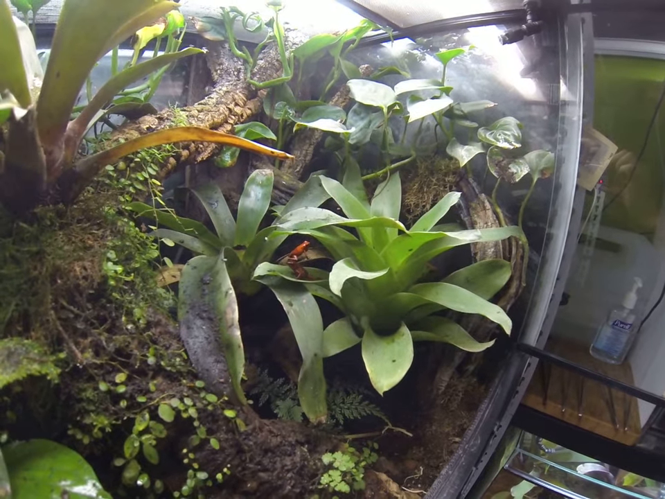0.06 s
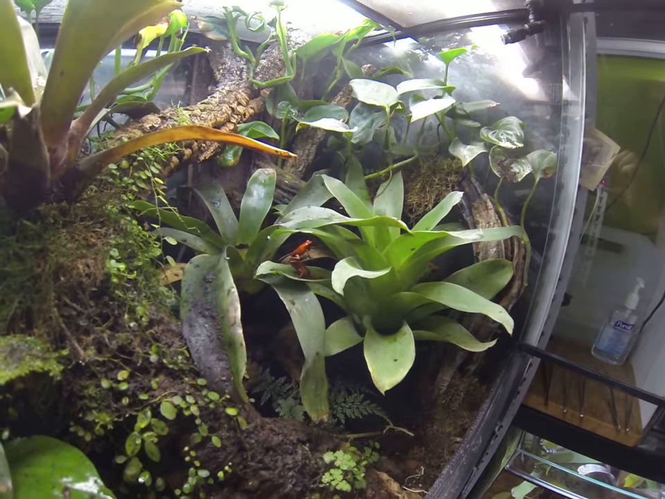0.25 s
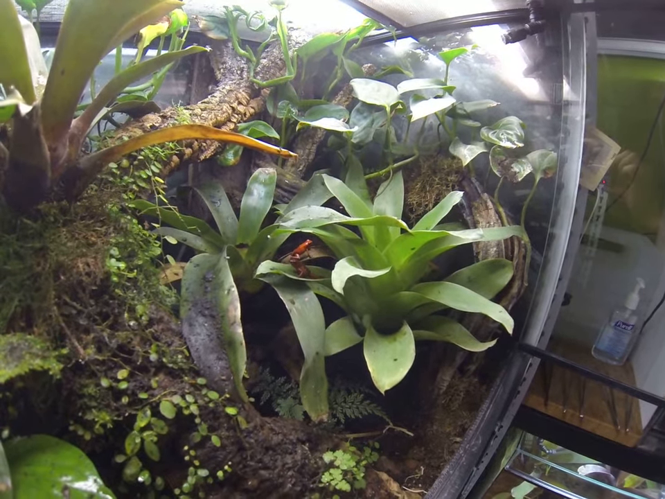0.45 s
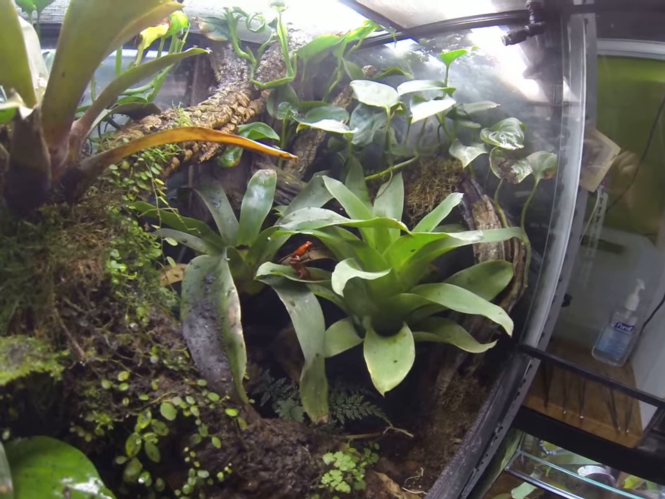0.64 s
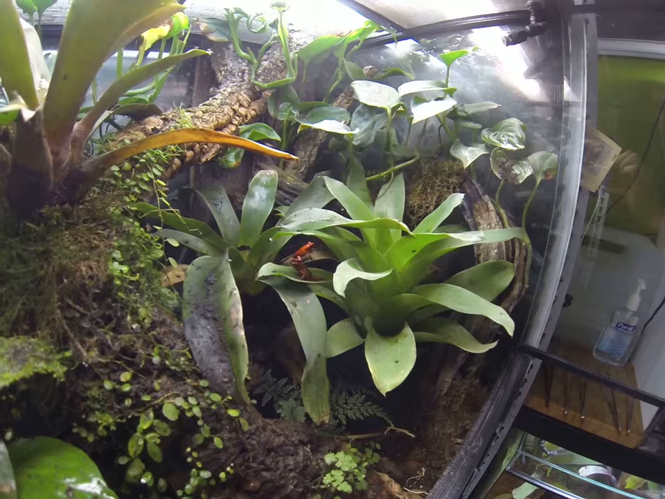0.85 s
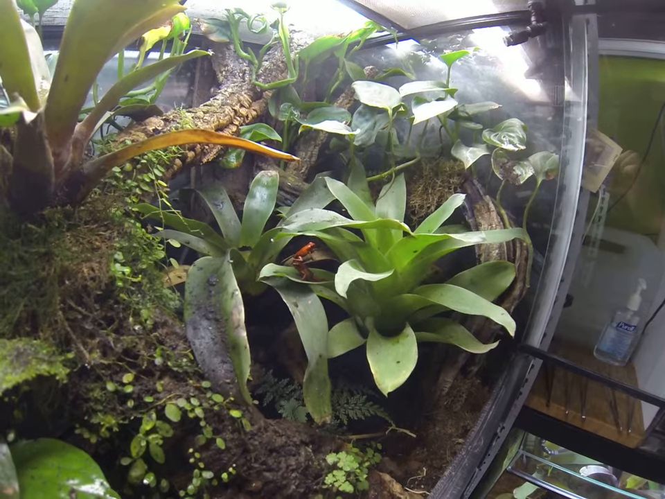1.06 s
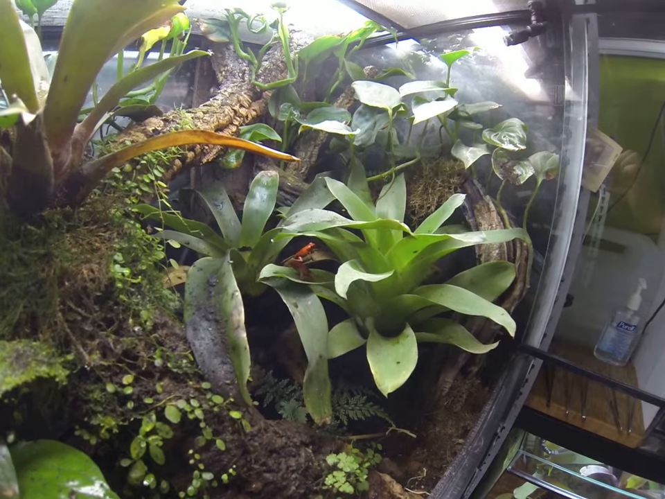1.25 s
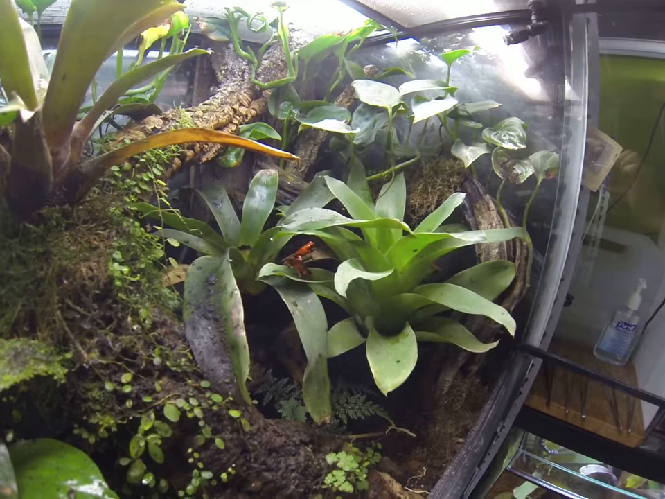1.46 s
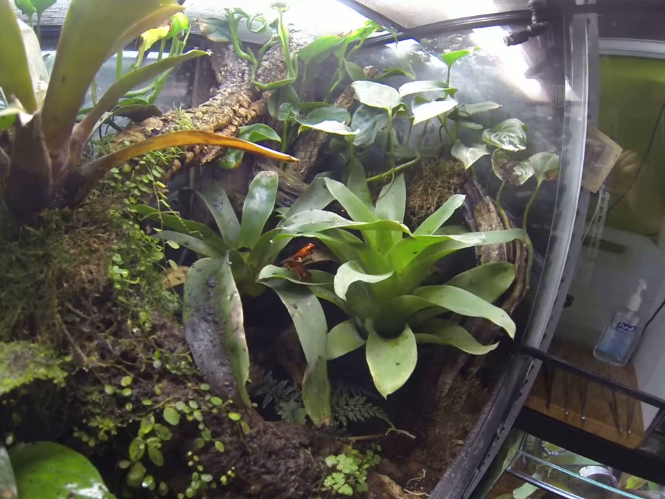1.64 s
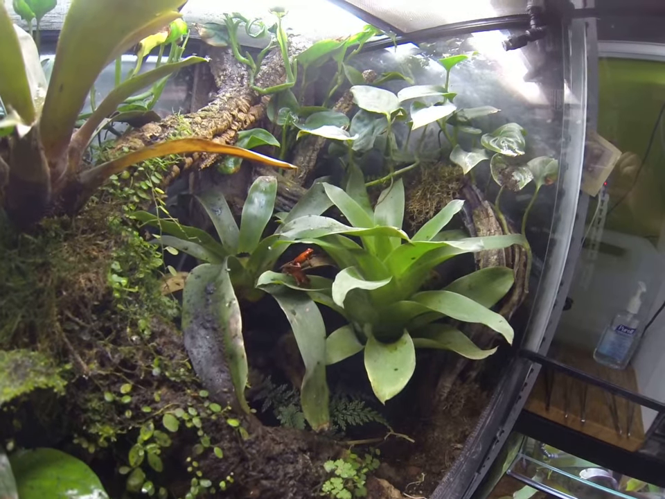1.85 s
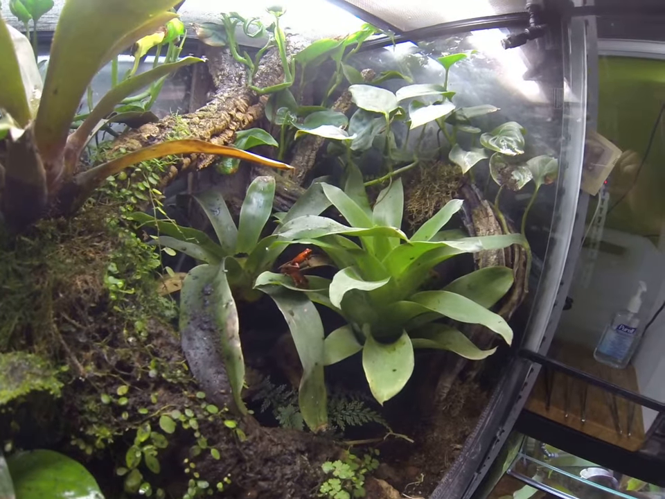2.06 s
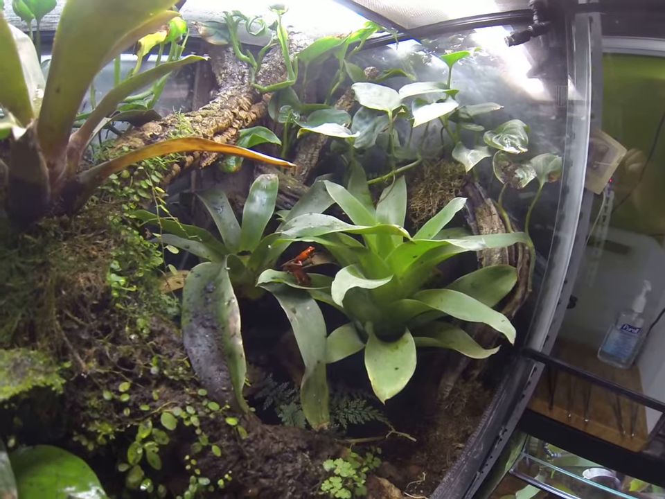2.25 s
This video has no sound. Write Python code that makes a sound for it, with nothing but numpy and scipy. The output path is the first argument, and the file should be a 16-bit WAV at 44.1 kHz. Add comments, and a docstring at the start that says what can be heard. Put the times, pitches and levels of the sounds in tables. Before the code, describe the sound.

A small frog chirps in short, buzzy pulses over a faint low hum.

```python
"""A small poison frog calls in a glass terrarium: about six short, buzzy chirps a second.
Each chirp is a swelling train of uneven clicks that ring its vocal sac; the pitch creeps up over
the bout. Leaves and glass close by colour the call and the room rings faintly.
Behind it: equipment hum, a soft rush of fans, thin hiss and a low rumble."""
import sys
import numpy as np
from scipy import signal
from scipy.fft import rfft, irfft, next_fast_len
from scipy.io import wavfile
from scipy.ndimage import map_coordinates

SR = 44100
rng = np.random.default_rng(int(sys.argv[2]) if len(sys.argv) > 2 else 0)


def materialize(psi):
    """Save the field psi as 16-bit PCM at rate SR to the path in sys.argv[1].

    A 1-D psi becomes a single channel; in a 2-D psi each row is a channel.
    """
    bounded = np.clip(np.atleast_2d(psi).T, -1, 1)
    quanta = np.round(bounded * 32767).astype(np.int16)
    wavfile.write(sys.argv[1], SR, quanta)


N = 105840

SAC_HZ = 4075  # reference pitch of the sac spectrum
ONSET_S = .004  # margin ahead of each chirp


def amp(db):
    """Decibels to gain."""
    return 10 ** (np.asarray(db) / 20)


def along(points, hz):
    """Interpolate (freq_hz, value) points on a log axis."""
    freqs, values = np.transpose(points)
    return np.interp(np.log(hz + 1), np.log(freqs + 1), values)


def wobble(rate_hz, count=N):
    """Smooth random curve, rate_hz knots a second."""
    return map_coordinates(rng.standard_normal(512), [np.arange(count) * rate_hz / SR])


def filtered(x, response):
    """Apply a frequency response to x."""
    size = next_fast_len(len(x) + 8192)
    return irfft(rfft(x, size) * response(np.fft.rfftfreq(size, 1 / SR)), size)[:len(x)]


def noise(spectrum):
    """Coloured noise, rms 1."""
    x = filtered(rng.standard_normal(N), lambda hz: amp(along(spectrum, hz)))
    return x / np.sqrt(np.mean(x ** 2) + 1e-20)


def equipment_hum():
    """Fan and pump tones, wavering in level and phase."""
    # tones: freq_hz, level_db
    tones = [(43, -59), (62, -59), (124, -64), (378, -74.5), (394, -73.5)]
    waver_db, drift_rad = 2.5, 1.1
    t = np.arange(N) / SR
    return sum(amp(db + waver_db * wobble(2.99)) * np.sqrt(2)
               * np.sin(2 * np.pi * hz * t + drift_rad * wobble(3.2)) for hz, db in tones)


def room_noise():
    """Low rumble, a fan rush that swells and sags, and even air hiss."""
    # rumble spectrum: freq_hz, density_db
    rumble_shape = [(10, -4.5), (22, -8.5), (45, 6.5), (62, -5), (80, -15), (135, -12), (180, -31.5),
                    (400, -42.5), (2000, -86.5)]
    # fan spectrum: freq_hz, density_db
    fan_shape = [(40, -9.5), (135, 5.5), (185, -3), (250, 0), (390, -1.5), (440, -10.5), (700, -15.5),
                 (2000, -52)]
    # fan envelope: time_s, relative_db
    fan_envelope = [(0.0, -57), (0.04, -58.5), (0.58, -63), (0.61, -54), (0.84, -64), (1.74, -59.5),
                    (1.76, -56.5), (2.15, -64.5), (2.4, -62)]
    # hiss spectrum: freq_hz, density_db
    hiss_shape = [(100, -6.5), (700, 3), (1200, -0.5), (2500, -7.5), (5000, -13.5), (9000, -21.5),
                  (15000, -30.5)]
    fan_db = 2.5 + np.interp(np.arange(N) / SR, *np.transpose(fan_envelope))
    rumble = amp(-48.5) * noise(rumble_shape)
    fans = amp(fan_db) * noise(fan_shape)
    return rumble + fans + amp(-64) * noise(hiss_shape)


def tail(decay):
    """Diffuse decay of energy 1 from (freq_hz, t60_s) points."""
    hz, t, bins = signal.stft(rng.standard_normal(SR // 2), SR, nperseg=256)
    y = signal.istft(bins * amp(-60 * t / along(decay, hz)[:, None]), SR, nperseg=256)[1]
    return y / np.linalg.norm(y)


def enclosure():
    """Impulse response: direct sound, short terrarium ring, longer room ring."""
    # room decay: freq_hz, t60_s
    room_decay = [(1500, 0.93), (4000, 0.33), (7000, .38), (10000, 0.34)]
    # colour of both rings: freq_hz, gain_db
    colour = [(1500, 7), (2800, 8), (3400, 2), (3950, 1.5), (4400, 0.5), (5000, 3), (6500, -0.5),
              (9000, 1.5), (14000, -1.5)]
    tank_t60_s = .04
    rings = amp(-12) * tail([(SAC_HZ, tank_t60_s)]) + amp(-21.5) * tail(room_decay)
    response = filtered(rings, lambda hz: amp(along(colour, hz)))
    response[0] += 1
    return response


def leaves_and_glass(hz):
    """Comb response of the direct path plus close reflections."""
    # reflections: delay_ms, signed_gain
    echoes = [(1.31, -.2), (1.462, -.13), (1.974, .3), (2.03, .08), (2.534, .13), (2.678, .13),
              (3.182, -.08), (3.798, .13), (3.862, .13), (5.734, -.08)]
    return 1 + sum(gain * np.exp(-2j * np.pi * hz * ms / 1000) for ms, gain in echoes)


def whistle(t, length_s, pitch_hz):
    """Thin, rough overtone bending down as the chirp closes; stronger in higher chirps."""
    ahead_s, half_width_s = .0018, .0045
    ratio, drop = 2.36, .12
    from_peak = (t - length_s + ahead_s) / half_width_s
    hz = pitch_hz * ratio * (1 - drop * (1 + np.tanh(from_peak)) / 2)
    rough_rad = .7 * wobble(900, len(t))
    envelope = amp(-65 + .0111 * (pitch_hz - SAC_HZ)) * np.exp(-from_peak ** 2)
    return envelope * np.sin(2 * np.pi * np.cumsum(hz) / SR + rough_rad)


def air_puffs(t, hz, click_s, strengths):
    """Spectrum of the decaying air noise after each click."""
    # puff colour: freq_hz, relative_db
    colour = [(300, -68.5), (1800, -50), (2800, -30.5), (4100, -25), (5500, -41), (7200, -43), (8400, -32),
              (9400, -38.5), (11000, -52.5), (12200, -55), (15000, -72)]
    decay_s = .0019
    age_s = t - click_s[:, None]
    envelope = strengths ** .97 @ ((age_s >= 0) * np.exp(-np.abs(age_s) / decay_s))
    puffs = envelope * rng.standard_normal(len(t)) / np.sqrt(decay_s * SR / 2)
    return rfft(puffs) * amp(-3.5 + along(colour, hz))


def vocal_sac(hz, pitch_hz):
    """Sac response to one click: a short ring that sweeps downward."""
    # sac spectrum at SAC_HZ: freq_hz, gain_db
    spectrum = [(300, -56.5), (1000, -50), (1800, -33.5), (2300, -34.5), (3000, -18), (3550, -9),
                (3900, -2), (4130, 2.5), (4600, -10.5), (5200, -18), (6300, -27), (7200, -44.5),
                (8300, -41), (9400, -35), (11000, -61.5), (12300, -69.5), (15000, -81.5)]
    # arrival time in the sweep: freq_hz, delay_ms
    sweep = [(2000, .45), (3300, .3), (4130, 0), (5200, -.2), (6500, -.3), (8000, .6), (15000, .6)]
    low_hz, high_hz = 2320, 6550  # only this band follows the pitch
    snap = .35  # share of minimum phase; below 1 softens the attack
    warped_hz = np.interp(hz, [0, low_hz, pitch_hz, high_hz, SR / 2],
                          [0, low_hz, SAC_HZ, high_hz, SR / 2])
    gain = amp(along(spectrum, warped_hz))
    cepstrum = irfft(np.log(gain))
    half = len(cepstrum) // 2
    min_phase_rad = rfft(np.r_[cepstrum[0], 2 * cepstrum[1:half], cepstrum[half]], len(cepstrum)).imag
    sweep_rad = 2 * np.pi * np.cumsum(along(sweep, warped_hz) / 1000) * hz[1]
    return gain * np.exp(1j * (snap * min_phase_rad - sweep_rad))


def click_train(t, length_s, pitch_hz, lead_s, lock, first_db):
    """Times, strengths and pitches of uneven clicks: faint lead-in, swell, quick release."""
    rate_hz, jitter_s, scatter_db = 353.1, .00012, .6
    attack_s, release_s, release_db_per_s = .010, .006, 3000
    lead_db, lead_pitch_ratio, pitch_rise = -28, 1.084, .016
    # slow start, rush at the end
    haste = .18 * np.clip(t / length_s, 0, 1) ** 5 - .2 * np.exp(-np.maximum(t, 0) / attack_s)
    cycles = np.cumsum(rate_hz * np.exp(haste + .05 * wobble(50, len(t)))) / SR
    cycles -= np.interp(0, t, cycles)
    first = np.ceil(np.interp(-lead_s, t, cycles) - .5)
    index = np.arange(first, np.interp(length_s + release_s, t, cycles))  # negative in the lead-in
    jitter, scatter = rng.standard_normal((2, 64))[:, :len(index)]
    click_s = np.interp(index, cycles, t) + jitter_s * jitter
    click_s += lock * (np.round(click_s * pitch_hz) / pitch_hz - click_s)  # pull to whole sac periods
    swell = 1 - (1 - amp(first_db)) * np.exp(-np.maximum(click_s, 0) / attack_s)
    swell *= amp(-release_db_per_s * np.maximum(click_s - length_s, 0))
    strengths = np.where(index < 0, amp(lead_db), swell) * amp(scatter_db * scatter)
    bend = np.where(index < 0, lead_pitch_ratio, 1 + pitch_rise * (click_s / length_s - .5))
    return click_s, strengths, pitch_hz * bend


def chirp(length_s, pitch_hz, lead_s, lock, first_db, size=4096):
    """Clicks ring the sac, with air puffs and a closing whistle; leaves and glass reflect it all."""
    t = np.arange(size) / SR - ONSET_S - lead_s
    hz = np.fft.rfftfreq(size, 1 / SR)
    click_s, strengths, pitches_hz = click_train(t, length_s, pitch_hz, lead_s, lock, first_db)
    ring = sum(gain * vocal_sac(hz, sac_hz) * np.exp(-2j * np.pi * (at_s - t[0]) * hz)
               for at_s, gain, sac_hz in zip(click_s, strengths, pitches_hz))
    voice = ring + air_puffs(t, hz, click_s, strengths) + rfft(whistle(t, length_s, pitch_hz))
    return irfft(voice * leaves_and_glass(hz))


def frog():
    """The bout of chirps, each ringing in terrarium and room; only the echo of the first is heard."""
    # chirps: start_s, length_s, level_db, pitch_hz, lead_in_s, sac_lock_share, first_click_db
    chirps = [(-.125, 0.07, -22.5, 4250, 0.00097, 0.51, -18), (.2022, 0.058, -26, 3810, 0.0016, 0.27, -8),
              (0.389, 0.043, -24, 3970, 0.0068, 0.51, -15.5), (0.5597, .037, -23.5, 4010, 0.0038, 0.2, -15),
              (0.7249, 0.049, -22, 4040, 0, 0.36, -16.5), (0.8922, 0.045, -22.5, 4080, 0.011, 0.04, -15),
              (1.0748, 0.051, -22.5, 4110, 0, .6, -14), (1.2474, .038, -22.5, 4160, 0.0089, 0.21, -9),
              (1.3912, .046, -21.5, 4180, 0.0039, 0.1, -15.5), (1.5926, 0.052, -22, 4170, 0.0013, 0.07, -8),
              (1.754, 0.046, -21, 4190, 0.015, 0.16, -14), (1.903, 0.049, -21.5, 4230, 0.0022, 0.24, -14),
              (2.0733, 0.054, -22, 4250, 0.00096, 0.27, -13)]
    out = np.zeros(N + 2 * SR)
    zero = round(.25 * SR)  # sample at time 0
    for start_s, length_s, level_db, pitch_hz, lead_s, lock, first_db in chirps:
        space = enclosure()
        call = signal.fftconvolve(chirp(length_s, pitch_hz, lead_s, lock, first_db), space)
        call *= amp(level_db) * np.sqrt(length_s * SR / np.sum(call ** 2))
        start = zero + round((start_s - lead_s - ONSET_S) * SR)
        out[start:start + len(call)] += call
    return out[zero:zero + N]


def scene():
    """The frog over the quiet room, mono."""
    return (frog() + equipment_hum() + room_noise())[None]


def record(dry):
    """Brick-wall low-pass."""
    top_hz = 15020
    return np.array([filtered(x, lambda hz: hz < top_hz) for x in dry])


dry = scene()
out = record(dry)
materialize(out)
```